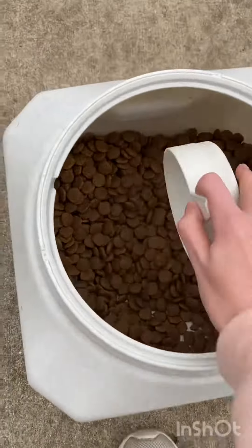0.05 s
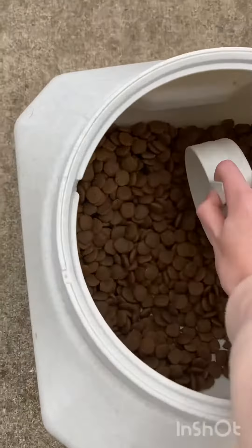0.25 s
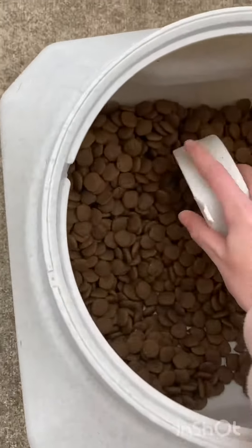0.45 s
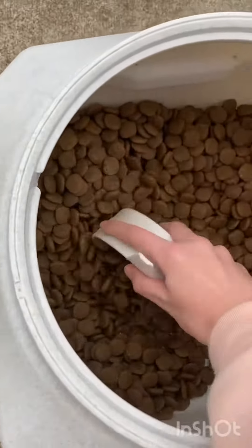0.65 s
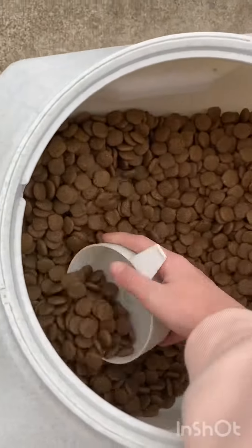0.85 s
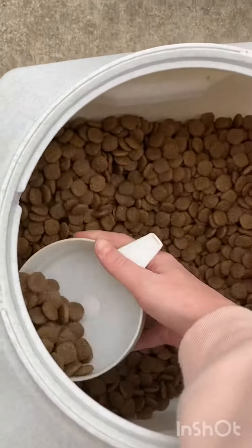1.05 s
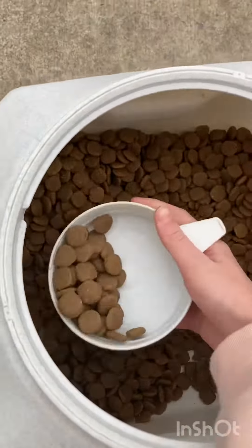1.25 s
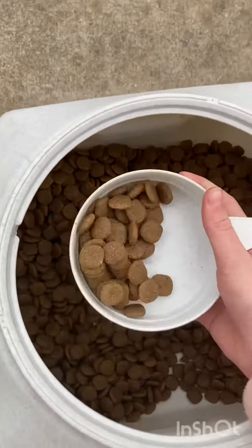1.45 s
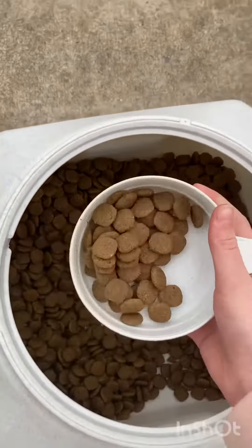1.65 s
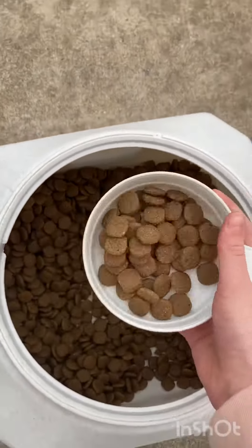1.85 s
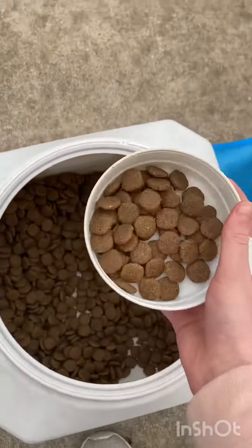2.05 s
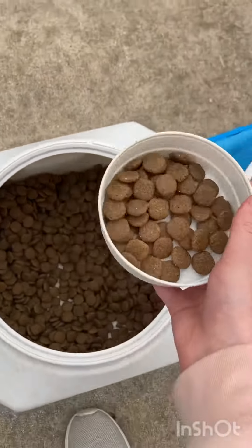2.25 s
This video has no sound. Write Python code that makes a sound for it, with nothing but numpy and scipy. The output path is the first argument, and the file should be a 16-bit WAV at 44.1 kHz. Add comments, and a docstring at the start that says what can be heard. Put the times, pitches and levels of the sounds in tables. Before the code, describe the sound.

Dry kibble is scooped from a plastic bin, heard close. A soft rustle at 0.2 seconds builds into a gritty crunch with a hollow boom around 0.5. More short crunches and sharp clicks of pieces on plastic follow from 0.8 to 1.1. Then the kibble rattles and knocks in the scoop in short, lighter shakes until about 2.3 seconds, over faint outdoor air and slight handling rumble.

```python
"""Scooping dry kibble from a plastic bin

A scoop is shoved through the heap: many small impacts sum to a crunch, and the bin's resonances boom.
Friction makes the scoop's rim sing, single pieces knock on it, and shakes slide the lifted load level.
A phone held close above hears this at two microphone ports, with hand rumble and faint outdoor air."""
import sys
import numpy as np
from scipy import signal
from scipy.fft import rfft, irfft
from scipy.io import wavfile
from scipy.ndimage import uniform_filter1d

SR = 44100
rng = np.random.default_rng(int(sys.argv[2]) if len(sys.argv) > 2 else 0)


def master_out(mix):
    """Clip the mix to full scale and print it as 16-bit PCM to the path in sys.argv[1]."""
    frames = np.transpose(np.atleast_2d(mix))
    ceiling = np.clip(frames, -1, 1)
    pcm = np.round(ceiling * 32767).astype(np.int16)
    wavfile.write(sys.argv[1], SR, pcm)


N = 101429

# Levels in the tables are relative; each source adds its own gain.
# shoves that make the heap give way (start [s], length [s], crunch [dB], grit [dB], boom [dB])
SHOVES = [(.178, 0.034, -40, -49, -46), (.207, 0.029, -44.5, -52.5, -37), (.27, 0.078, -61, -59.5, -56.5),
          (.372, 0.038, -42, -56.5, -40.5), (.408, 0.096, -35, -48.5, -33), (.485, 0.046, -27, -35, -26),
          (.546, 0.046, -26.5, -30.5, -24.5), (.601, 0.025, -28.5, -41, -28.5),
          (.64, 0.066, -33, -45, -29.5), (.72, 0.071, -40, -53.5, -40.5), (.834, 0.014, -27.5, -43, -26),
          (.868, 0.012, -27.5, -38.5, -32.5), (.915, 0.0031, -30.5, -56, -32),
          (.946, 0.031, -28, -41.5, -28.5), (.994, 0.024, -31.5, -51, -33), (1.026, 0.011, -37.5, -56, -43),
          (1.057, 0.0081, -31.5, -46.5, -38)]
# shakes of the load in the lifted scoop (start [s], length [s], rattle [dB], grit [dB])
SLIDES = [(1.15, 0.35, -50.5, -62), (1.236, 0.0087, -32, -41.5), (1.262, 0.014, -40.5, -70),
          (1.301, 0.0041, -32.5, -41), (1.319, .06, -42, -63), (1.51, 0.043, -35.5, -47),
          (1.575, 0.067, -32.5, -46), (1.68, 0.061, -32.5, -49), (1.702, 0.021, -32, -36),
          (1.765, 0.073, -31, -41.5), (1.865, 0.017, -31.5, -40.5), (1.89, 0.042, -37.5, -53),
          (1.942, 0.035, -33.5, -45), (2.025, 0.0056, -34.5, -50.5), (2.089, 0.034, -39.5, -52.5),
          (2.177, 0.026, -36, -49.5)]
# single pieces striking the scoop (time [s], level [dB], pitch [Hz], tick [dB], snap [dB])
KNOCKS = [(0.176, -31.5, 960, -46.5, -34.5), (0.273, -57, 990, -50, -57), (0.544, -16, 2420, -50, -22.5),
          (0.552, -35, 950, -27, -19.5), (0.682, -27, 910, -37, -43), (0.693, -16, 1110, -27.5, -30.5),
          (0.78, -46, 950, -41.5, -50), (0.802, -23, 1000, -47, -29.5), (0.817, -18.5, 2270, -39, -29),
          (0.824, -15, 1860, -43, -33), (0.933, -11, 1610, -30, -24), (0.966, -21, 1420, -33, -23),
          (0.974, -32, 921, -36, -25), (0.994, -14, 880, -50, -44), (1.069, -24.5, 780, -49, -41),
          (1.088, -18, 1300, -39.5, -25.5), (1.111, -20, 2026, -48, -35.5), (1.134, -19.5, 1380, -56, -39),
          (1.143, -21, 950, -58, -45), (1.172, -27, 830, -62, -61), (1.182, -36, 1370, -52, -38),
          (1.201, -28, 785, -44.5, -59), (1.232, -23, 805, -42, -40), (1.298, -25.5, 1110, -36.5, -28),
          (1.402, -24, 2920, -60, -38), (1.455, -21, 1110, -55, -36.5), (1.574, -25, 980, -43, -35),
          (1.684, -19.5, 1920, -53, -36), (1.713, -24, 1380, -44, -23.5), (1.864, -22.5, 1250, -47, -30.5),
          (1.94, -20.5, 860, -55, -39), (1.956, -25, 1650, -34, -28.5), (2.024, -28, 1240, -55, -51),
          (2.258, -30.5, 1340, -88, -69)]
# rubs of the rim on the kibble (start [s], length [s], pitch [Hz], level [dB])
RIM_RUBS = [(0.188, 0.054, 1000, -40), (1.1, 0.018, 2030, -37.5), (0.836, 0.013, 2460, -30),
            (0.838, 0.036, 1150, -30.5), (1.01, 0.0061, 1620, -32.5)]
# spectra of kibble in the heap and in the scoop (frequency [Hz], level [dB])
HEAP_SPECTRUM = [(350, -8), (480, -3), (650, -1.5), (880, 13.5), (1300, 2), (2300, -1), (3600, -5),
                 (5000, -17), (6300, -17.5), (8000, -24), (11000, -25.5), (13000, -33.5), (15000, -37.5)]
LOAD_SPECTRUM = [(350, -8), (480, -11.5), (650, -7), (880, 3.5), (1300, 1.5), (2300, -3.5), (3600, -9.5),
                 (5000, -31), (6300, -18), (8000, -21.5), (11000, -22.5), (13000, -33), (15000, -33)]
# normal modes of the bin and of the scoop (frequency [Hz], level [dB], 60 dB decay time [s])
BIN_MODES = [(138.6, 1, 0.12), (249, 2, 0.083), (295, 2, 0.1)]
SCOOP_MODES = [(831, 9, 0.08), (900, 3, 0.073), (1138, 3, 0.17), (1298, 6.9, 0.33), (1665, 6.1, 0.11),
               (2230, 5.5, 0.2), (2435, 8.9, 0.09), (3290, 12, 0.08)]
# the bin's air resonance, moving as the scoop sinks in and turns (time [s], frequency [Hz])
CAVITY_GLIDE = [(0.42, 235.9), (0.52, 251), (0.599, 240.8), (0.661, 218), (0.778, 179.5), (0.83, 225.8),
                (0.97, 229.5)]
# phase lead of the left port over the right (frequency [Hz], phase [rad])
PORT_PHASE = [(0, 0), (950, -1.4), (1980, 1.1), (3100, 0.8), (3360, 2.1), (4130, 1.7), (5000, 3.0),
              (6800, 4.3), (7670, 6.0), (9560, 6.6), (11100, 9.4), (12900, 9.5), (13700, 12.5),
              (16200, 12.5)]
# level of the left port over the right (frequency [Hz], level [dB])
PORT_BALANCE = [(60, 2), (110, -0.5), (200, -0.5), (380, 4), (700, -2), (1290, -7.5), (2380, -4.5),
                (4400, -3), (8120, 2), (15000, 0)]
# jolts of the hand on the phone (start [s], length [s], level [dB])
JOLTS = [(1.775, 0.019, -48), (1.88, 0.15, -41), (1.955, 0.011, -33.5)]
# spectra of the hand's rumble and of the outdoor air (frequency [Hz], level [dB])
RUMBLE_SPECTRUM = [(20, -38), (40, -12.5), (60, -0.5), (100, 0), (140, -5), (200, -14), (320, -24.5),
                   (600, -27.5), (1500, -54.5)]
AIR_SPECTRUM = [(180, -20.5), (300, -4), (416, -15.5), (1010, -19.5), (2440, -21), (4390, -24.5),
                (5440, -34), (6300, -28), (15000, -43)]

SHOVE_ATTACK_S, SHOVE_RELEASE_S = 0.0059, 0.013
SLIDE_ATTACK_S, SLIDE_RELEASE_S = 0.0096, 0.018
GRIT_HZ, SCRAPE_S = 5390, 0.0051  # lower edge of the grit; decay of the rubbing after a contact
THUD_HZ, THUD_DB = 816, 11  # the floor of the scoop
DRIFT_DB_PER_S = -0.4  # left over right: the scoop moves to the right


def digging():
    """Granular flow: each shove sets pieces colliding, excites the rim and makes the bin boom."""
    impacts = contacts(per_s=2400, scatter_db=3.5, cycles=14.2)
    body, grit = body_and_grit(colour(impacts, HEAP_SPECTRUM))
    rim = undb(-11.5) * steady(band(noise(), 773, 1020, order=2), size=900)
    crunch = (body + rim) * undb(0.5) * surges(SHOVES, column=2)
    return crunch + grit * undb(4.5) * surges(SHOVES, column=3) + bin_boom()


def bin_boom():
    """Forced resonance: the shoves drive the air cavity and the wall modes of the bin."""
    walls = ring(noise(), BIN_MODES) + undb(-7) * unit(band(noise(), 77, 357, order=2))
    cavity = resonance(np.interp(times(), *np.array(CAVITY_GLIDE).T), width_hz=47)
    boom = cavity + undb(-3) * steady(walls, size=1400)
    return boom * undb(-2.5) * surges(SHOVES, column=4, release_s=0.021)


def sliding():
    """Granular rattle: each shake sends the load over the floor of the hollow scoop, which drums."""
    impacts = contacts(per_s=1400, scatter_db=2.5, cycles=26)
    body, grit = body_and_grit(colour(impacts, LOAD_SPECTRUM))
    hollow = undb(-19) * unit(band(noise(), 148, 322, order=2))
    rattle = (body + hollow) * undb(0.5) * surges(SLIDES, 2, SLIDE_ATTACK_S, SLIDE_RELEASE_S)
    return rattle + grit * undb(2) * surges(SLIDES, 3, SLIDE_ATTACK_S, SLIDE_RELEASE_S)


def knocking():
    """Impact excitation: a hard piece on plastic gives a pitched knock, a crack, a snap and a tick."""
    out, t = np.zeros(N + SR), times()[:SR // 20]
    onset = 1 - burst(t, 0.00058)
    for at, db, hz, tick_db, snap_db in KNOCKS:
        rough = rng.standard_normal((3, 2 * len(t)))
        crack = steady(band(rough[0], 0.59 * hz, 2.1 * hz), size=120)[-len(t):]
        snap = steady(band(rough[1], 2340, 5000), size=80)[-len(t):]
        tick = steady(band(band(rough[2], 3840, 13800), 4770, 6900, order=1), size=60)[-len(t):]
        # scaled by db here and again in the knock, so it stands out under the hardest blows
        thud = undb(db + THUD_DB) * np.sin(2 * np.pi * THUD_HZ * t)
        tone = (np.sin(2 * np.pi * hz * t) + thud) * burst(t, 0.0025)
        knock = undb(db - 2.5) * (tone + undb(-5.5) * crack * fade(t, t60=0.019))
        snap *= undb(snap_db + 2) * burst(t, 0.0042)
        tick *= undb(tick_db + 11) * burst(t, 0.0035)
        start = int(at * SR)
        out[start:start + len(t)] += (knock + snap + tick) * onset
    return out[:N]


def singing():
    """Frictional excitation: the scoop's rim catches on the kibble and sings briefly."""
    return sum(resonance(rub[2], width_hz=68) * surges([rub], column=3) for rub in RIM_RUBS)


def contacts(per_s, scatter_db, cycles):
    """Superposition of random impacts: each rings at six pitches that fall 60 dB in `cycles` periods."""
    count, t = int(per_s * N / SR), times()[:400]
    out = np.zeros(N + len(t))
    where = rng.integers(N, size=(count, 1)) + np.arange(len(t))
    strength = undb(np.minimum(rng.exponential(size=(count, 1)), 4.6) * scatter_db)
    for k in range(6):
        hz = 330 * 2 ** (.95 * (k + rng.random((count, 1))))  # about an octave apart
        push = rng.uniform(-1, 1, (count, 1))
        np.add.at(out, where, strength * push * hz * fade(t, cycles / hz) * np.sin(2 * np.pi * hz * t))
    return unit(out[:N])


def body_and_grit(impacts):
    """Impact and friction: contacts split into body and treble grit, where rough faces rub on briefly."""
    decay = np.exp(-times()[:SR // 50] / SCRAPE_S)
    rubbing = np.sqrt(np.abs(signal.fftconvolve(band(impacts, GRIT_HZ, 12000) ** 2, decay)[:N]))
    scrape = unit(rubbing * band(colour(noise(), HEAP_SPECTRUM), GRIT_HZ))
    grit = unit(band(impacts, GRIT_HZ)) + undb(1) * scrape
    return steady(band(impacts, 376, GRIT_HZ), size=800), steady(grit, size=1000)


def ring(x, modes):
    """Modal response: x is convolved with a unit-energy sum of damped sinusoids."""
    t = times()[:SR // 4]
    response = sum((-1) ** k * undb(db) * fade(t, t60) * np.sin(2 * np.pi * hz * t)
                   for k, (hz, db, t60) in enumerate(modes))
    return signal.fftconvolve(x, response / np.sqrt(np.sum(response ** 2)))[:N]


def resonance(hz, width_hz):
    """Randomly driven resonance: narrowband noise around a fixed or moving pitch."""
    lowpass = signal.butter(2, width_hz / 2, fs=SR, output="sos")
    wander = signal.sosfilt(lowpass, noise() + 1j * noise())
    phase = 2 * np.pi * np.cumsum(hz * np.ones(N)) / SR
    return steady(np.real(wander * np.exp(1j * phase)), size=1000)


def bin_echo(x):
    """Reverberation: dense, short reflections from the bin's walls, drawn anew for each port."""
    t = times()[:SR // 5]
    tail = band(noise(), 880, 3660)[:len(t)] * fade(t, t60=0.017) * (1 - np.exp(-t / 0.0032))
    return undb(-15) * signal.fftconvolve(x, tail / np.sqrt(np.sum(tail ** 2)))[:N]


def ports(pair):
    """Spaced receivers: phase and level differ between the two ports, and the balance drifts right."""
    f = np.fft.rfftfreq(2 * N, 1 / SR)
    phase = np.interp(f, *np.array(PORT_PHASE).T)
    hz, db = np.array(PORT_BALANCE).T
    balance_db = np.interp(np.log(f + 1), np.log(hz), db)
    sides = np.array([[0.5], [-0.5]])
    heard = irfft(rfft(pair, 2 * N) * undb(sides * balance_db) * np.exp(1j * sides * phase))[:, :N]
    return heard * undb(sides * DRIFT_DB_PER_S * (times() - N / SR / 2))


def hand_rumble():
    """Structure-borne sound: the hand shakes both ports, and each adds a deep rumble of its own."""
    shared = colour(noise(), RUMBLE_SPECTRUM)
    own = [undb(1) * band(colour(noise(), RUMBLE_SPECTRUM), 18, 80, order=2) for _ in range(2)]
    grip = undb(-44.5) + surges(JOLTS, column=2, attack_s=0.0097, release_s=0.0053)
    return np.array([steady(shared + deep, size=3000) for deep in own]) * grip


def outdoor_air():
    """Ambient noise: faint, steady and uncorrelated between the ports."""
    air = [unit(band(colour(noise(), AIR_SPECTRUM), 190, 12000)) for _ in range(2)]
    return undb(-56.5) * np.array(air)


def surges(rows, column, attack_s=SHOVE_ATTACK_S, release_s=SHOVE_RELEASE_S):
    """Incoherent addition: each row rises, holds at its level in `column` and decays; powers add."""
    t, power = times(), 0
    for row in rows:
        start, length = row[:2]
        flow = np.exp(np.minimum(t - start, 0) / attack_s - np.maximum(t - start - length, 0) / release_s)
        power += (flow * undb(row[column])) ** 2
    return np.sqrt(power)


def colour(x, points):
    """Minimum-phase filtering through points of (frequency [Hz], level [dB])."""
    hz, db = np.array(points).T
    f = np.maximum(np.fft.rfftfreq(8192, 1 / SR), 1)
    cepstrum = irfft(np.log(undb(np.interp(np.log(f), np.log(hz), db))))
    half = len(cepstrum) // 2
    cepstrum[1:half] *= 2
    cepstrum[half + 1:] = 0
    return signal.fftconvolve(x, irfft(np.exp(rfft(cepstrum))))[:N]


def steady(x, size):
    """Normalisation by the running RMS over `size` samples; the finer grain stays."""
    power = uniform_filter1d(uniform_filter1d(x ** 2, size), size // 2)
    return x / np.sqrt(np.abs(power) + 1e-12)


def band(x, lo_hz, hi_hz=.45 * SR, order=3):
    return signal.sosfilt(signal.butter(order, [lo_hz, hi_hz], "band", fs=SR, output="sos"), x)


def burst(t, length_s):
    return np.exp(-(t / length_s) ** 2)


def fade(t, t60):
    return np.exp(-np.log(1000) * t / t60)


def unit(x):
    return x / np.sqrt(np.mean(x ** 2))


def undb(db):
    return 10 ** (np.asarray(db) / 20)


def times():
    return np.arange(N) / SR


def noise():
    return rng.standard_normal(N)


def scene():
    """Superposition: kibble, ringing scoop and reflections reach the ports over the background."""
    kibble = digging() + singing() + sliding() + knocking()
    kibble += undb(-24.5) * ring(kibble, SCOOP_MODES)
    aside = undb(-11) * band(digging() + sliding(), 650, 12000)  # pieces off to either side
    pair = np.array([kibble + bin_echo(kibble) + side * aside for side in (1, -1)])
    return ports(pair) + hand_rumble() + outdoor_air()


def record(dry):
    """Band limiting: the phone cuts the treble steeply above 15.9 kHz."""
    return signal.sosfilt(signal.ellip(8, .2, 70, 15900, fs=SR, output="sos"), dry)


dry = scene()
out = record(dry)
master_out(out)
```